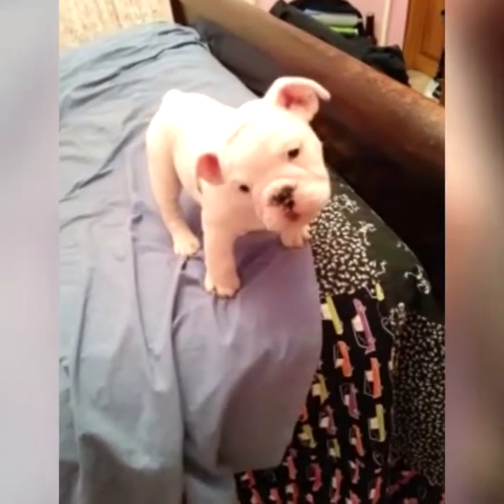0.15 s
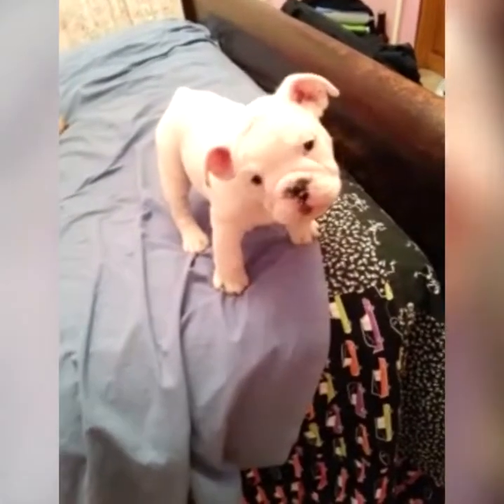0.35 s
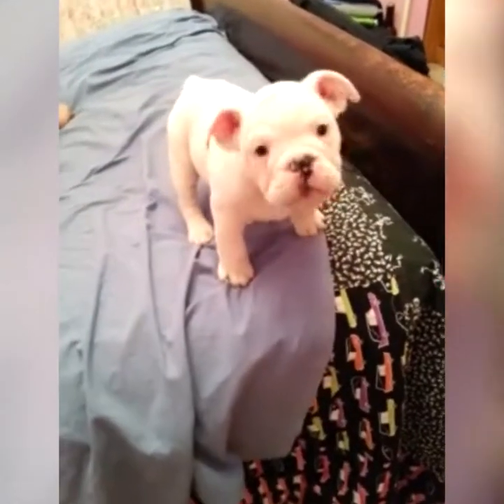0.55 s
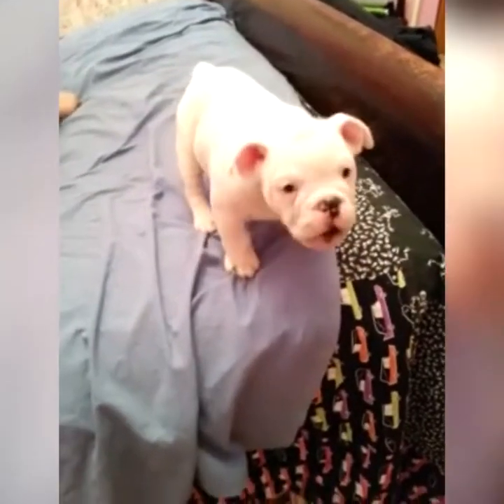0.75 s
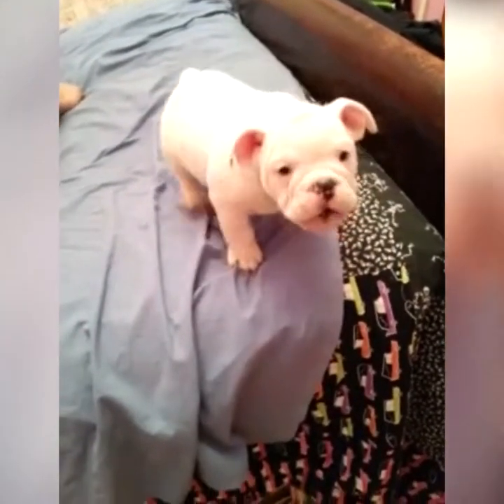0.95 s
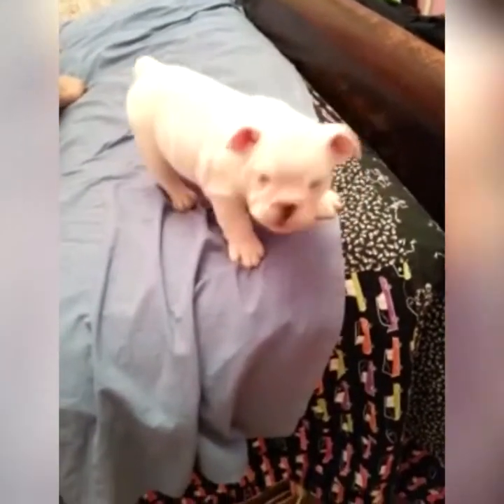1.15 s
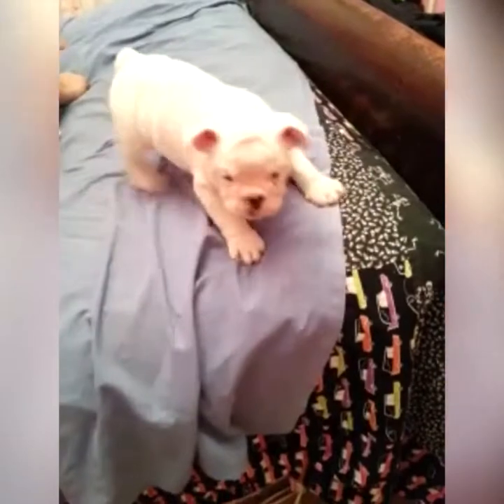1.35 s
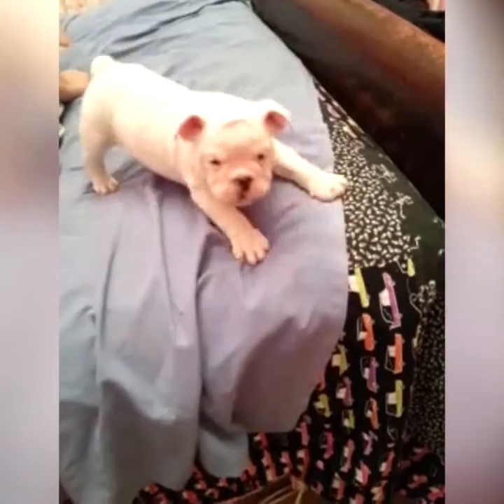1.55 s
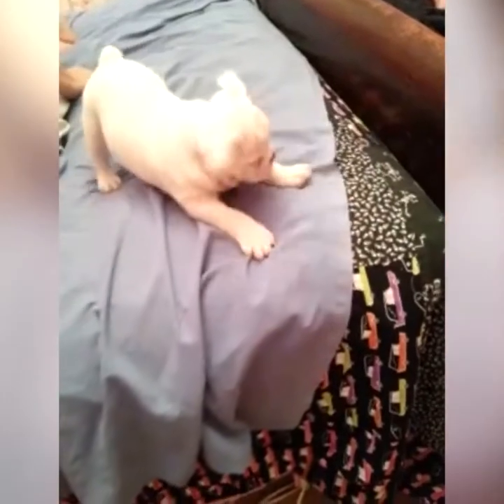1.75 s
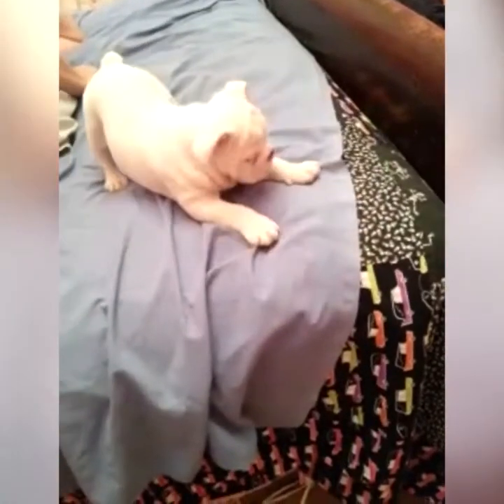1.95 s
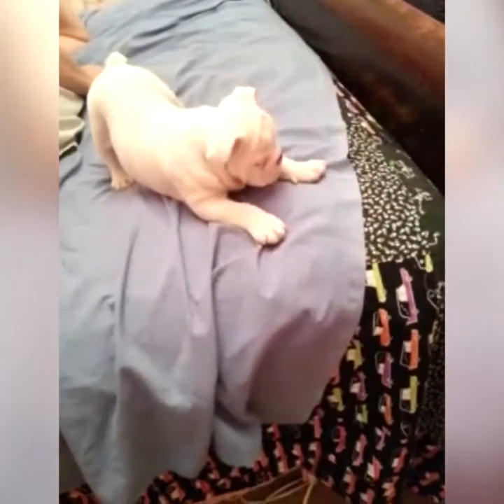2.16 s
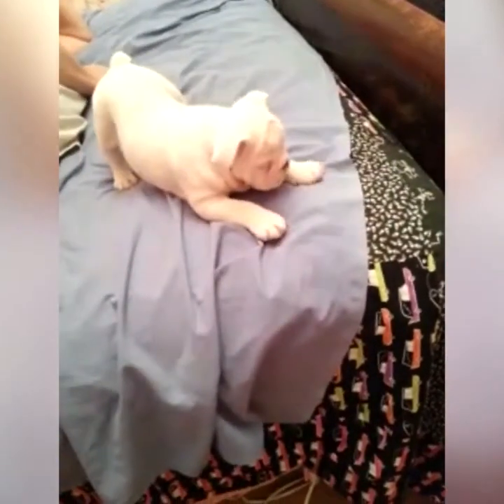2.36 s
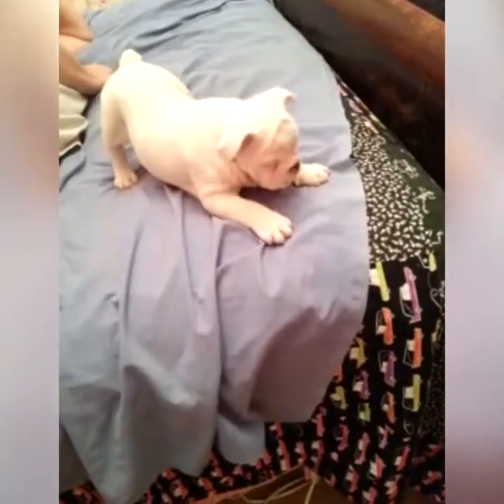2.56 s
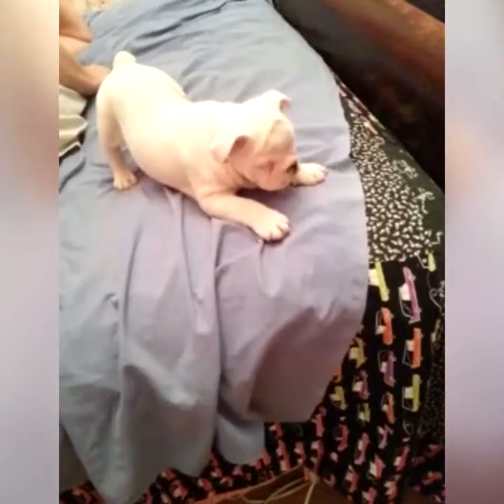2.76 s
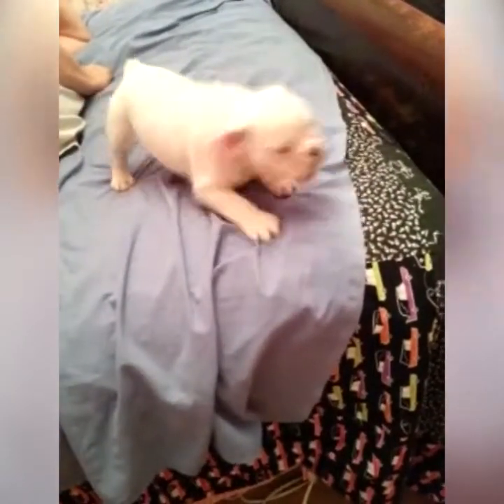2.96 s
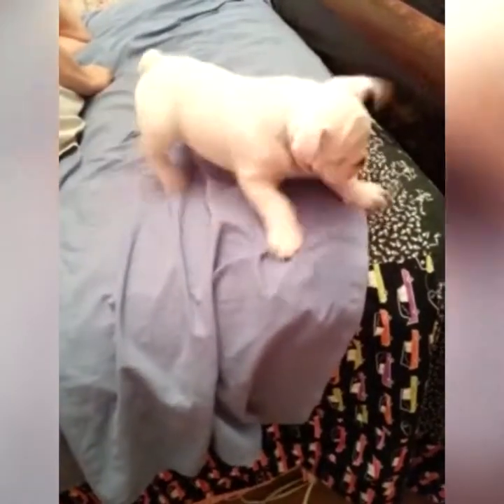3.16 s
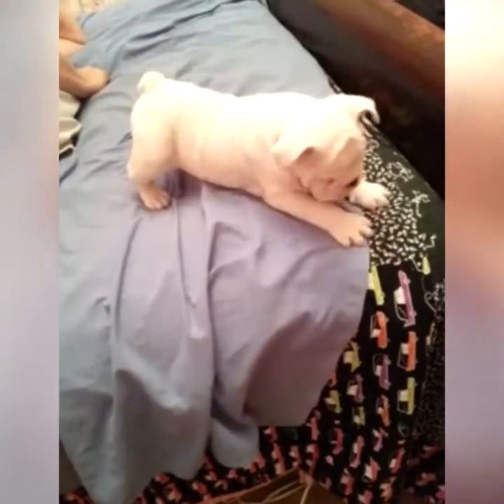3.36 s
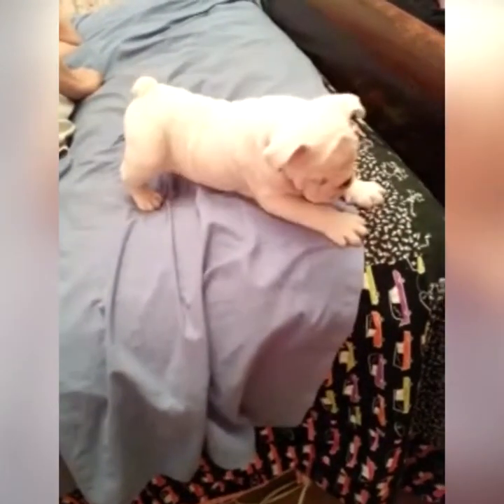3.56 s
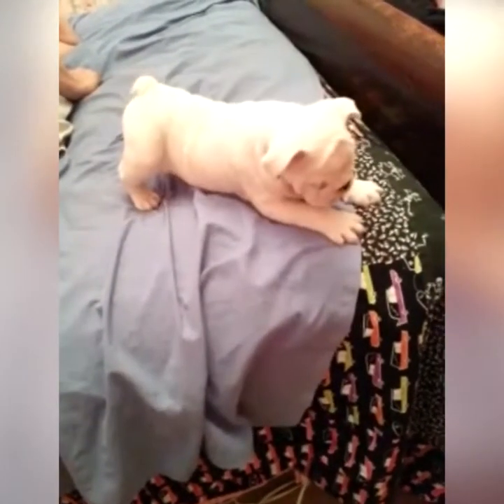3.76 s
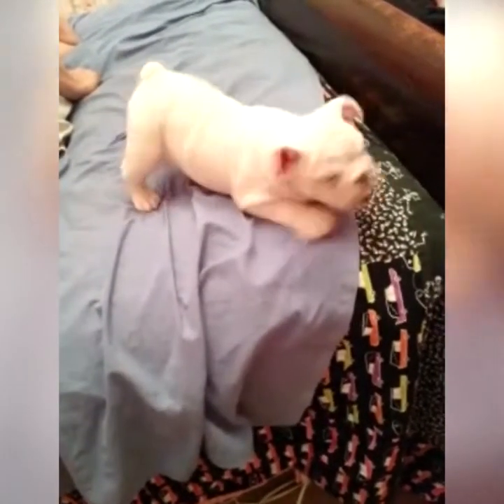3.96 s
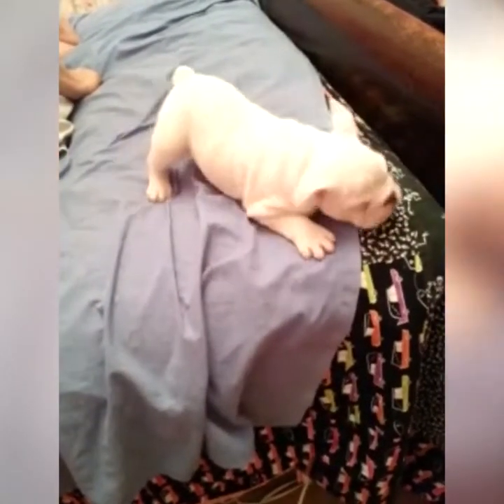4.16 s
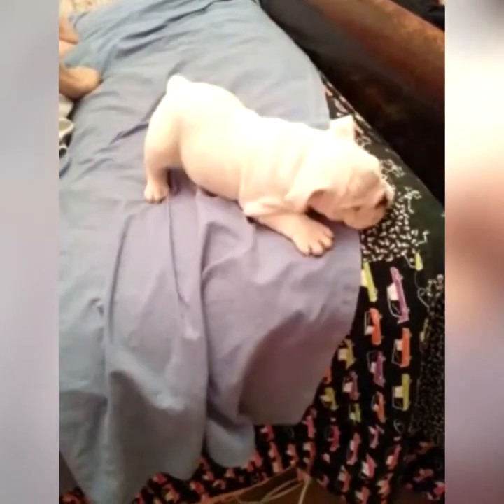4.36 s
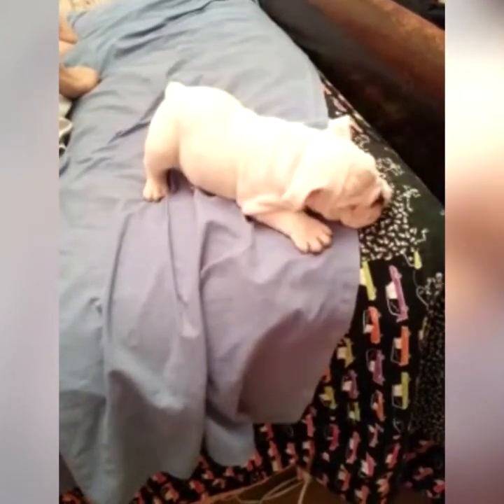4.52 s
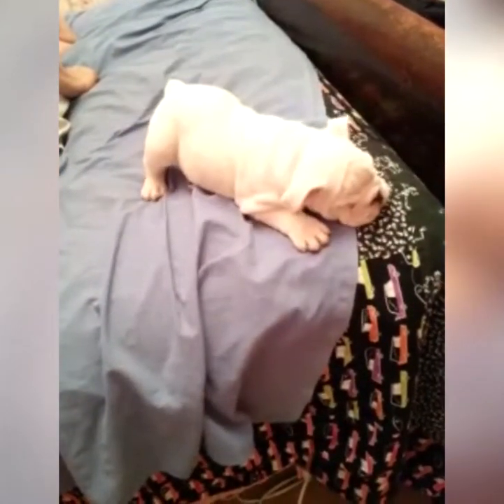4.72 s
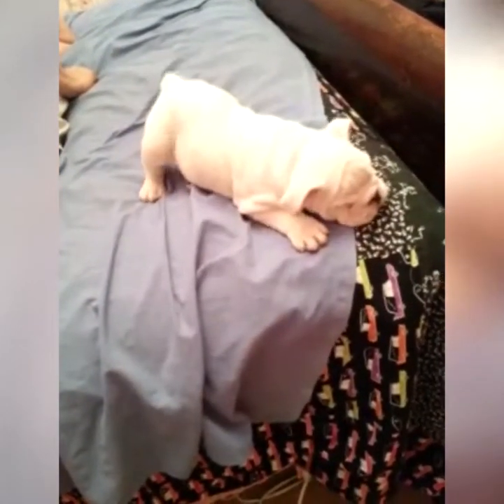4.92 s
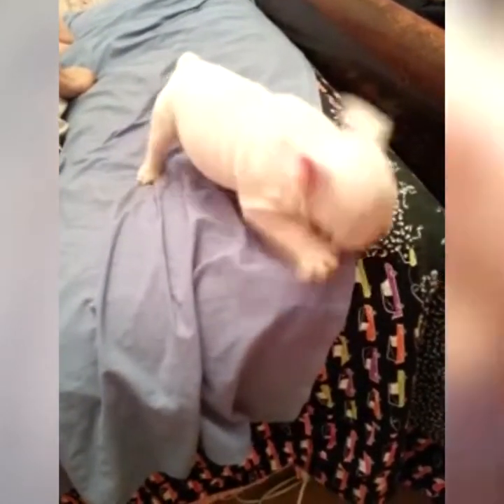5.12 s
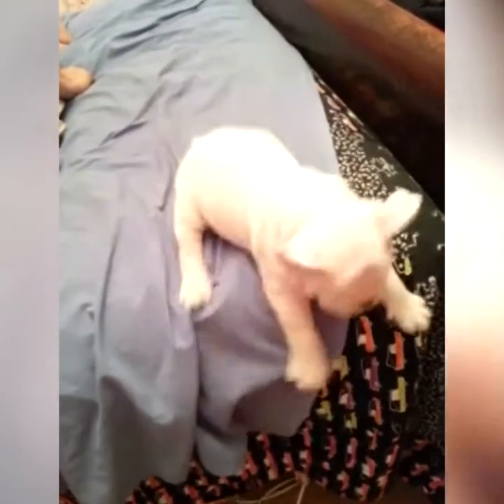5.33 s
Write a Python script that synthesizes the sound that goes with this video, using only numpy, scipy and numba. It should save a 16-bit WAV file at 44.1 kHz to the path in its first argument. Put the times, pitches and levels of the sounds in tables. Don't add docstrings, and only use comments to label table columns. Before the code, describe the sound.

Phone stereo of a puppy's play barking in a soft small room with short reverb. Low rumble and light hiss throughout. First a breathy, raspy woof and throbbing growl, then silence, a tiny growl and a high overloaded yap, a second yap about a second later, and finally a deeper gruff bark that dies into a grumble, with mouth ticks and bedding rustle.

```python
import sys
import numpy as np
from scipy import signal
from scipy.fft import rfft, irfft, next_fast_len
from scipy.io import wavfile
from scipy.ndimage import uniform_filter1d
from numba import njit

SR = 44100
rng = np.random.default_rng(int(sys.argv[2]) if len(sys.argv) > 2 else 0)


def voltage_ratio(decibels):
    exponent = np.asarray(decibels, float) / 20
    return 10 ** exponent


def generate_wav(signal):
    frames = np.transpose(np.atleast_2d(signal))
    scaled = np.clip(frames, -1, 1) * 32767
    pcm = np.round(scaled).astype(np.int16)
    wavfile.write(sys.argv[1], SR, pcm)


N = 242077

# frequency in Hz, density in dB per Hz.
RUMBLE = [(15, -31.5), (28, -18.5), (45, -20.5), (75, -7), (110, 0), (180, 2), (300, -5.5), (500, -12),
          (900, -42), (2000, -63)]
# frequency in Hz, density in dB per Hz.
HISS = [(300, -24.5), (600, 2), (1200, -4), (2500, -5), (5000, -9), (7500, -8.5), (8200, -10),
        (11000, -13.5), (13500, -12), (14700, -10.5)]
RUMBLE_DB, HISS_DB = -57, -60
# middle in seconds, half length in seconds, level in dB.
RUSTLES = [
    (0.835, 0.14, -58.5),
    (1.598, 0.68, -56),
    (3.25, 0.37, -53),
    (4.298, 0.19, -59),
    (5.444, 0.45, -49.5),
]
# middle in seconds, half length in seconds, level in dB.
SHUFFLES = [
    (.9, 0.21, -66),
    (3.32, .22, -56),
    (4.418, 0.099, -57.5),
    (4.8, 0.24, -61),
    (5.449, 0.097, -56),
]
# frequency in Hz, density in dB per Hz.
MATTRESS = [(90, -27.5), (200, -3.5), (330, 2.5), (550, -6.5), (1100, -34)]
# frequency in Hz, time to fall 60 dB in seconds, level in dB.
BEDROOM = [(150, 0.27, -7), (500, 0.12, -4), (970, 0.25, -2.5), (1650, .26, 5), (3130, 0.26, 8.5),
           (5850, 0.12, 3), (9900, 0.037, 10)]
# frequency in Hz, likeness from 0 to 1.
ROOM_LIKENESS = [(150, 1), (420, 1), (750, 0.19), (1500, 0), (3000, 0.14)]
# frequency in Hz, left minus right in dB.
LEFT_TILT = [(150, 0), (400, -0.5), (700, 7), (1100, -0.5), (1500, 3.5), (2200, -2.5), (3400, 2.5),
             (5200, 5.5), (7700, -4.5), (10000, -2), (13000, 3.5)]
# frequency in Hz, lag in samples.
LEFT_LAG = [(420, 3), (800, 9), (1500, 9), (2200, 13)]

# time in seconds, peak in dB, throat ring in Hz, brightness in dB.
SMACKS = [
    (0.796, -29, 1126, 7),
    (0.803, -44, 1220, -3),
    (1.024, -33.5, 1134, -3),
    (4.019, -40, 609.3, -16),
    (4.301, -31, 990, -21),
    (5.082, -30.5, 571, -5.5),
    (5.446, -33, 537.7, -20),
]
# centre in Hz, width in Hz, level in dB.
TICK = [(3330, 260, 0), (4700, 500, -12), (2100, 200, -18)]

# time in seconds, peak in dB.
SURGES = [(1.047, -37), (1.078, 15), (1.101, -8), (1.134, -28), (1.144, -26), (1.18, 7), (1.209, 20),
          (1.249, -14), (3.015, -12.5), (3.029, -28), (3.049, -3), (3.074, 3.5), (4.035, -12), (4.061, 3),
          (4.07, 2.5), (4.086, 0.5), (5.132, -14.5), (5.151, -6), (5.171, -0.5), (5.251, -32), (5.279, -3),
          (5.309, -10), (5.349, -16), (5.374, -16)]
# first in seconds, period in seconds, scatter in periods, level in dB, how many.
THROBS = [
    (1.328, .0355, .33, -15, 16),
    (2.734, .0357, .03, -26, 8),
]
# time in seconds, effort in dB, jaw opening 0-1, fold rate in Hz, unevenness 0-1.
RASP = [(1.04, -46, 0, 99.3, 0), (1.048, -18, 0.79, 120.6, 0.54), (1.09, -25.5, 0.7, 193.6, 0.66),
        (1.14, -17.5, 0.39, 234.4, 0.64), (1.165, -21, 0.26, 217.2, 0.8), (1.22, -21.5, 0.94, 199.4, 0.74),
        (1.27, -31, 0.15, 168.5, 0.88)]
LONG_GROWL = [(1.3, -31.5, 0.024, 168, 0.88), (1.38, -28.5, 0.094, 160.6, 0.51),
              (1.499, -34.5, 0.013, 150, 0.61), (1.608, -35, 0.067, 147.8, 0.53),
              (1.741, -33, .2, 145.4, .65), (1.88, -31.5, 0.14, 139.4, 0.56),
              (1.93, -50.5, 0.027, 141.1, 0.48)]
SHORT_GROWL = [(2.726, -67, 0.043, 84.6, 0.33), (2.736, -50, 0.098, 85.4, 0.32),
               (2.783, -37, 0.11, 94.56, 0.48), (2.861, -42, .12, 103.7, 0.34),
               (2.878, -38.5, .06, 109.9, 0.6), (2.95, -31, 0.14, 201, 0.44),
               (3.0, -22.5, 0.054, 286.1, 0.62)]
LOUD_BARK = [(3.012, -21.5, 0.6, 331.6, 0.93), (3.029, -2.5, .93, 506.4, .8),
             (3.05, -0.5, .85, 491.2, 0.49), (3.066, -11, 0.58, 426, 0.13), (3.102, -8.5, .7, 478.5, .03),
             (3.135, -16, 0.25, 430.6, 0.25), (3.162, -27.5, 0.46, 406.6, 0.11),
             (3.199, -29.5, 0.49, 405.4, 0.58)]
THIRD_BARK = [(4.015, -57, 0.028, 227.9, 0.067), (4.037, -27.5, .05, 246.7, 0.32),
              (4.06, -21.5, 0.07, 262.8, 0.99), (4.07, -6.5, 1, 500, 0.32), (4.092, -8.5, 0.69, 481, 0.36),
              (4.102, -5.5, 0.73, 416.7, 0.064), (4.144, -17.5, 0.34, 418.7, 0.041),
              (4.175, -16.5, 0.61, 383.1, 0.31), (4.195, -25.5, 0.12, 365, .3)]
LAST_BARK = [(5.125, -41, .1, 231.8, .1), (5.135, -26, 0.19, 235.5, 0.42), (5.154, -11.5, 1, 259.4, 0.32),
             (5.199, -17, 0.67, 240.2, .4), (5.235, -23, .2, 169.9, .7), (5.253, -19, 0.2833, 166, 0.7),
             (5.301, -30.5, 0.049, 144.1, 0.44), (5.38, -34, 0.028, 135.7, .6), (5.489, -68, .02, 119.4, 1)]
BREATHS = [RASP + LONG_GROWL, SHORT_GROWL + LOUD_BARK, THIRD_BARK, LAST_BARK]
# fold rates in Hz, and the share of the sound left at each.
SLOW_HZ, SHUT_REST = (95, 145, 400), (.05, 1.7, 2.5)

THROAT_HZ, PALATE_HZ, MOUTH_HZ = (525, 1140), (1300, 1310), 3400
THROAT_DB, CHEST_DB, PALATE_DB, MOUTH_DB = (-1.5, -1.5), (-0.5, -11.5), (-15, -29), (-26.5, -12)
LIPS_PART = 0.53
LOOSE_PALATE_DB = 11.5
LOOSE_FROM, LOOSE_SPREAD = .45, 6
AIR_SHARE = (.1, .1)
# centre in Hz, width in Hz, level in dB.
MOUTH = [(2107, 64, 6), (3160, 480, -5.5), (4180, 660, -6.5), (4550, 750, -14), (5386, 78, -1.5)]
# centre in Hz, width in Hz.
NOSE = [(1700, 100), (4350, 400)]
# frequency in Hz, density in dB per Hz.
BREATH = [(3600, -36), (4600, 3), (5100, 1), (5600, -3), (7000, -12), (8000, -9), (9000, -21),
          (11000, -8.5), (13000, -24.5), (15000, -25.5)]
# middle in seconds, half length in seconds, drop in Hz.
TONGUE = [
    (1.15, 0.07, 1300),
    (3.13, .11, 900),
    (4.14, 0.097, 1300),
]
# middle in seconds, half length in seconds, change in dB.
LIPS = [
    (1.09, 0.11, 4),
    (1.23, 0.045, -3.5),
    (1.6, 0.76, -4),
    (2.8, .1, -3.5),
    (3.11, 0.066, -2.5),
    (4.13, 0.033, 7.5),
    (5.18, 0.033, -2),
    (5.28, 0.062, 3),
]
# middle in seconds, half length in seconds, change in dB.
PALATE = [
    (1.14, 0.047, 9),
    (1.4, 0.15, 4.5),
    (2.85, .12, -2.5),
    (3.07, 0.048, -1.5),
    (4.11, 0.09, -7),
    (5.15, 0.016, 22.5),
    (5.27, .05, 13.5),
]
# middle in seconds, half length in seconds, change in dB.
CHEST = [
    (1.15, 0.056, -3.5),
    (1.7, 0.11, 0),
    (2.85, 0.23, -1),
    (3.035, .035, -9),
    (3.11, 0.059, -1),
    (4.075, .03, -10),
    (4.12, 0.046, -1),
    (5.22, 0.061, 3),
    (5.35, 0.042, 3.5),
]
# middle in seconds, half length in seconds, change in dB.
GASPS = [
    (1.13, 0.31, 7),
    (2.87, 0.48, -4),
    (3.04, 0.06, 6.5),
    (4.12, 0.14, -7.5),
    (5.2, .07, 4.5),
    (5.36, 0.081, 2.5),
]

# start in seconds, length in seconds, whistle in dB.
WHISTLED = [
    (1.07, .6, -61),
    (3.1, .15, -58),
    (4.12, .18, -60),
    (5.2, .13, -61),
]
# centre in Hz, width in Hz, share of the
# length, whistle in dB against the call's.
EMPTIED = [(7950, 500, .85, -25), (9188, 500, .3, -2), (9938, 700, 1.3, -14), (10688, 700, .8, 0),
           (11438, 700, 1, 0), (12188, 550, .6, -1)]
# start in seconds, end in seconds.
NO_BASS = [
    (1.1, 1.9),
    (5.2, 5.49),
]
# start in seconds, end in seconds.
NO_TOP = [
    (1.07, 1.31),
    (3.13, 3.17),
    (4.13, 4.25),
    (5.14, 5.29),
]


def unit(x):
    return x / np.sqrt(np.mean(x ** 2) + 1e-20)


def along(points, hz, column=1):
    points = np.transpose(points)
    return np.interp(np.log(hz + 1), np.log(points[0] + 1), points[column])


def curves(rows):
    s, *columns = np.transpose(rows)
    return [np.interp(np.arange(N) / SR, s, column) for column in columns]


def humps(rows):
    t = np.arange(N) / SR
    return sum(high * np.cos(np.pi / 2 * np.clip((t - s) / half, -1, 1)) ** 2 for s, half, high in rows)


def between(ends, share):
    return ends[0] + (ends[1] - ends[0]) * share


def filtered(x, response):
    m = next_fast_len(N + SR // 2)
    return irfft(rfft(x, m) * response(np.fft.rfftfreq(m, 1 / SR)), m)[..., :N]


def resonances(modes):
    def response(f):
        total = 0
        for k, (c, w, db) in enumerate(modes):
            total = total + (-1) ** k * voltage_ratio(db) * 1j * f * w / (c * c - f * f + 1j * f * w)
        return total
    return response


@njit
def swept(x, turn, radius):
    y = np.zeros(len(x))
    for i in range(2, len(x)):
        y[i] = x[i] - x[i - 2] + 2 * radius * np.cos(turn[i]) * y[i - 1] - radius * radius * y[i - 2]
    return y


def cavity(x, hz, width_hz):
    radius = np.exp(-np.pi * width_hz / SR)
    return (1 - radius) * swept(x, 2 * np.pi * hz / SR, radius)


def double_cavity(x, hz, width_hz):
    return cavity(cavity(x, hz, width_hz), hz, 1.5 * width_hz)


def steady(x):
    power = np.abs(uniform_filter1d(uniform_filter1d(x ** 2, size=3000), size=3000))
    return x / np.sqrt(power + 1e-20)


def patchy(spectrum, patchy_db):
    z = signal.stft(rng.standard_normal((2, N + 512)), nperseg=512)[2]
    field = uniform_filter1d(rng.standard_normal(z.shape[1:]), size=5, axis=0)
    field = uniform_filter1d(field, size=10, axis=1)
    pair = signal.istft(z * voltage_ratio(patchy_db * unit(field)), nperseg=512)[1][:, :N]
    return unit(filtered(pair, lambda hz: voltage_ratio(along(spectrum, hz))))


def background():
    rustle = humps([(s, half, voltage_ratio(db)) for s, half, db in RUSTLES])
    hum = voltage_ratio(-68.5) * np.sin(2 * np.pi * 60 * np.arange(N) / SR)
    weight = humps([(s, half, voltage_ratio(db)) for s, half, db in SHUFFLES])
    shuffle = weight * patchy(MATTRESS, patchy_db=3)
    rumble = patchy(RUMBLE, patchy_db=2)
    hiss = patchy(HISS, patchy_db=.6)
    return voltage_ratio(RUMBLE_DB) * rumble + (voltage_ratio(HISS_DB) + rustle) * hiss + hum + shuffle


def bedroom(x):
    out, step = np.zeros((2, N + SR)), SR // 8
    for start in range(0, N, step):
        hz, t, z = signal.stft(rng.standard_normal((2, SR // 2)), SR, nperseg=256)
        turn = np.arccos(np.clip(along(ROOM_LIKENESS, hz), -1, 1))[:, None] / 2
        shared, apart = np.cos(turn) * z[0], np.sin(turn) * z[1]
        z = np.array([shared + apart, shared - apart])
        t60 = along(BEDROOM, hz)[:, None]
        decay = voltage_ratio(along(BEDROOM, hz, column=2)[:, None] - 60 * t / t60)
        decay = decay / np.sqrt(t60 * SR / (6 * np.log(10)))
        tail = signal.istft(z * decay, SR, nperseg=256)[1]
        piece = x[start:start + 2 * step]
        piece = piece * np.hanning(2 * step)[:len(piece)]
        wet = signal.fftconvolve(piece[None], tail, axes=1)
        out[:, start + 130:][:, :wet.shape[1]] += wet
    return out[:, :N]


def smacks():
    out, bright, t = np.zeros(N + SR), np.zeros(N), np.arange(SR // 20) / SR
    for s, db, hz, bright_db in SMACKS:
        start = round(s * SR)
        out[start:][:len(t)] += voltage_ratio(db - 60 * t / .024) * np.sin(2 * np.pi * hz * t)
        bright[start] = voltage_ratio(db + bright_db + 20)
    return out[:N] + filtered(bright, resonances(TICK))


def controls():
    rows = []
    for calls in BREATHS:
        first, last = calls[0], calls[-1]
        rows += [(first[0] - .006, -110, *first[2:]), *calls, (last[0] + .04, -110, *last[2:])]
    effort_db, jaw, rate_hz, uneven = curves(rows)
    return effort_db, np.clip(jaw, 0, 1), rate_hz, np.clip(uneven, 0, 1)


def gusts():
    rows = list(SURGES)
    for s, period, scatter, db, count in THROBS:
        chance = rng.standard_normal((int(count), 2))
        times = s + period * (np.arange(len(chance)) + scatter * chance[:, 0])
        rows += zip(times, db + 4 * chance[:, 1])
    s, db = np.transpose(rows)
    return np.round(s * SR).astype(int), voltage_ratio(db)


def surges(marks, rest):
    t = np.arange(SR // 8) / SR
    burst = (1 - np.exp(-t / .002)) * np.exp(-t / .013)
    swell = np.abs(signal.fftconvolve(np.bincount(*marks, N), burst)[:N])
    mean = np.abs(uniform_filter1d(swell, size=3000))
    return (swell + rest * mean + 1e-5) / ((1 + rest) * mean + 1e-5)


def folds(rate_hz, uneven, marks):
    chance = rng.standard_normal((3000, 2))
    cycles = np.cumsum(rate_hz) / SR
    starts = np.searchsorted(cycles, np.arange(1, int(cycles[-1])))
    chance = chance[:len(starts)]
    period = SR / rate_hz[starts]
    when = starts + .3 * uneven[starts] * np.clip(chance[:, 0], -2, 2) * period
    size = voltage_ratio(4.5 * uneven[starts] * np.clip(chance[:, 1], -2.5, 1.3)) * np.sqrt(period)
    snaps = np.bincount(np.clip(when.astype(int), 0, N - 1), size, N)
    opening = marks[0] + 40
    snaps[opening] += 1.3 * np.sqrt(SR / rate_hz[opening])
    puffs = signal.lfilter([1], [1, -np.exp(-1 / (0.0018 * SR))], snaps)
    return snaps, steady(puffs) * rng.standard_normal(N)


def head(x):
    def response(hz):
        small = (hz ** 2 / (105 ** 2 - hz ** 2 + 1j * hz * 150)) ** 2
        nose = 1
        for c, w in NOSE:
            nose = nose * (c * c - hz * hz + .3j * hz * w) / (c * c - hz * hz + 1j * hz * w)
        return small * nose
    return filtered(x, response)


def voice():
    effort_db, jaw, rate_hz, uneven = controls()
    throat_db = effort_db + between(THROAT_DB, jaw)
    chest_db = effort_db + between(CHEST_DB, jaw) + humps(CHEST)
    palate_db = effort_db + between(PALATE_DB, jaw) + LOOSE_PALATE_DB * uneven + humps(PALATE)
    mouth_db = effort_db + between(MOUTH_DB, np.clip(jaw / LIPS_PART, 0, 1)) + humps(LIPS)
    throat_hz, palate_hz = between(THROAT_HZ, jaw), between(PALATE_HZ, jaw)
    mouth_hz = MOUTH_HZ - humps(TONGUE)
    chest_hz = np.clip(rate_hz, 215, 470)

    marks = gusts()
    snaps, air = folds(rate_hz, uneven, marks)

    def mix(share):
        return np.sqrt(1 - share) * snaps + np.sqrt(share) * air

    noisy = np.clip(between(AIR_SHARE, uneven), 0, 1)
    low = mix(noisy) * surges(marks, np.interp(rate_hz, SLOW_HZ, SHUT_REST))
    low = filtered(low, lambda hz: 1 / (1 + 1j * hz / 1500) ** 2)
    high = mix(np.clip(noisy + .85 * uneven, 0, .9)) * surges(marks, rest=1.2)

    chest = double_cavity(low, chest_hz, width_hz=300)
    throat = double_cavity(low, throat_hz, width_hz=215)
    palate = double_cavity(low, palate_hz, width_hz=270)
    blur = LOOSE_SPREAD * np.clip(uneven - LOOSE_FROM, 0, 1)
    palate = palate - blur * double_cavity(low, .92 * palate_hz, width_hz=750)
    tongue = double_cavity(high, mouth_hz, width_hz=520)
    still_mouth = filtered(high, lambda hz: resonances(MOUTH)(hz) * hz ** 2
                           / (1800 ** 2 - hz ** 2 + 1j * hz * 1500))
    breath = filtered(high * rng.standard_normal(N), lambda hz: voltage_ratio(along(BREATH, hz)))
    airflow = (voltage_ratio(mouth_db - 26.5) + voltage_ratio(chest_db - 21.0)) * voltage_ratio(humps(GASPS))

    layers = voltage_ratio(throat_db) * steady(throat)
    layers -= voltage_ratio(chest_db) * steady(chest)
    layers += voltage_ratio(palate_db) * steady(palate)
    layers += voltage_ratio(mouth_db) * steady(tongue + voltage_ratio(-5) * still_mouth)
    layers += airflow * steady(breath)
    return head(voltage_ratio(-1.5) * layers)


def scene():
    puppy = voice() + smacks()
    sides = np.array([[1], [-1]])
    direct = filtered(puppy[None], lambda hz: np.exp(-1j * np.pi * hz * along(LEFT_LAG, hz) / SR * sides))
    heard = direct + bedroom(puppy)
    return filtered(heard, lambda hz: voltage_ratio(along(LEFT_TILT, hz) * sides / 2)) + background()


def thinned(x):
    hz, frames, z = signal.stft(x, SR, nperseg=1024)
    lots = np.kron(rng.random((110, 90)), np.ones((5, 6)))[:len(hz), :len(frames)]
    keep = np.where((lots < .07) & (abs(hz[:, None] - 4900) < 3400), voltage_ratio(-30), 1)
    tones, t = np.zeros((2, N)), np.arange(N) / SR

    def empty(band, start, end):
        keep[np.ix_(band, (frames > start) & (frames < end))] = voltage_ratio(-28)

    for start, end in NO_BASS:
        empty(hz < 70, start, end)
    for start, end in NO_TOP:
        empty(hz > 13200, start, end)
    for start, length, whistle_db in WHISTLED:
        for centre_hz, width_hz, share, more_db in EMPTIED:
            end, db = start + share * length, whistle_db + more_db
            empty(abs(hz - centre_hz) < width_hz / 2, start, end)
            times = [start - .04, start - .02, end, end + .02]
            level = voltage_ratio(np.interp(t, times, [-120, db, db - 11, -120]))
            tones += 1.6 * level * np.sin(2 * np.pi * (centre_hz * t + .2 * rng.random((2, 1))))
    return signal.istft(z * keep * (hz < 14700)[:, None], SR, nperseg=1024)[1][:, :N] + tones


def top_cut(x):
    return signal.sosfilt(signal.butter(12, 15470, fs=SR, output="sos"), x)


def record(dry):
    x = thinned(dry)
    x = x / (1 + np.abs(x) ** 14) ** (1 / 14)
    return top_cut(x)


dry = scene()
out = record(dry)
generate_wav(out)
```